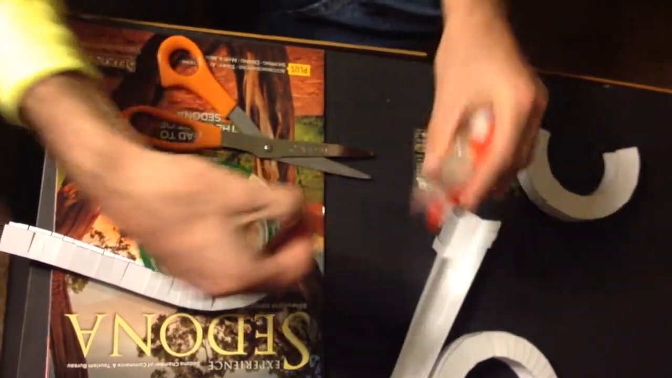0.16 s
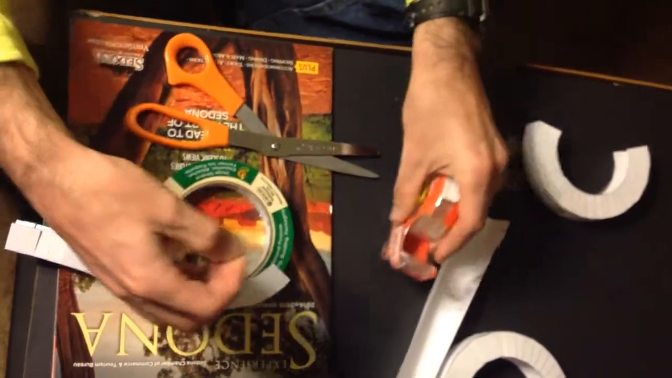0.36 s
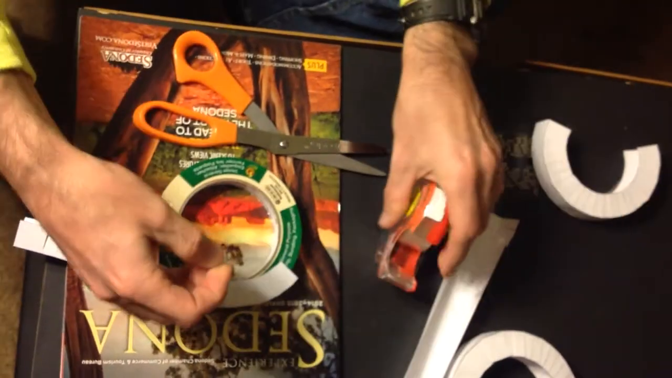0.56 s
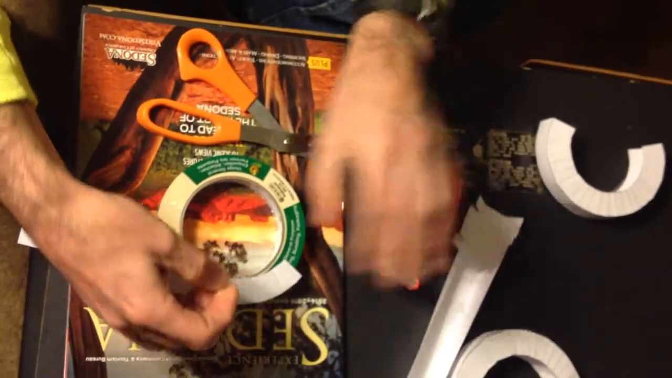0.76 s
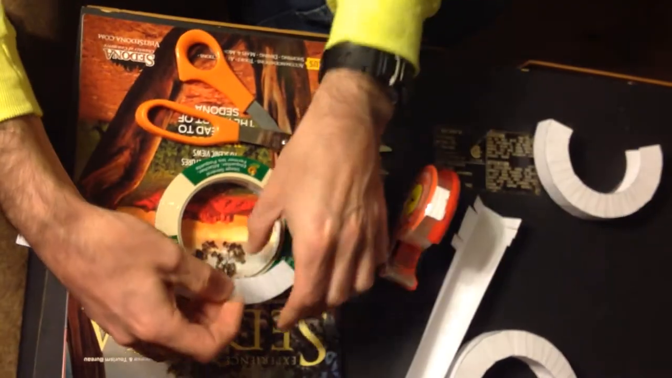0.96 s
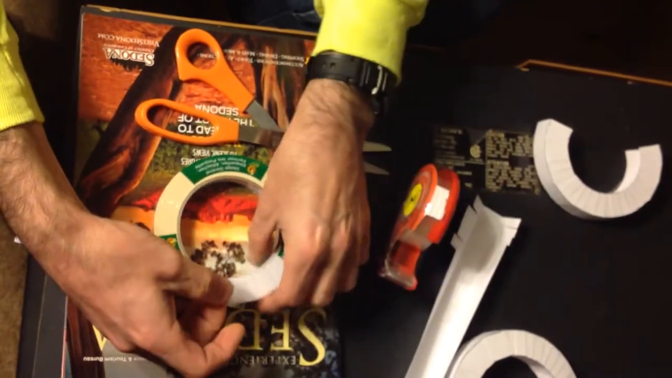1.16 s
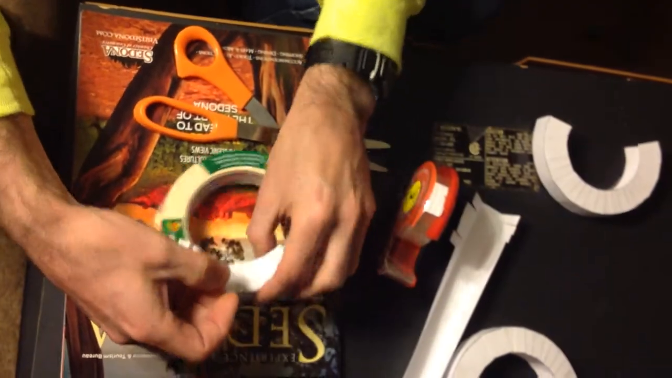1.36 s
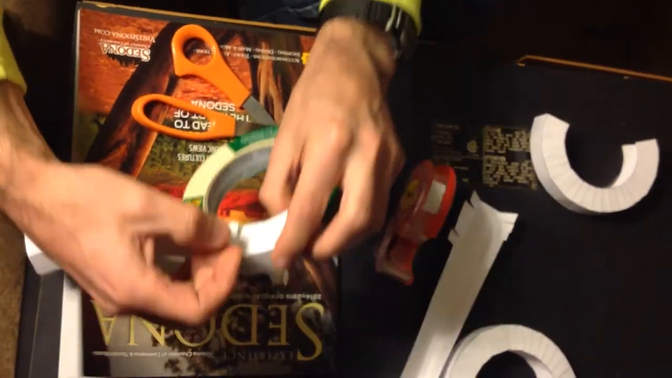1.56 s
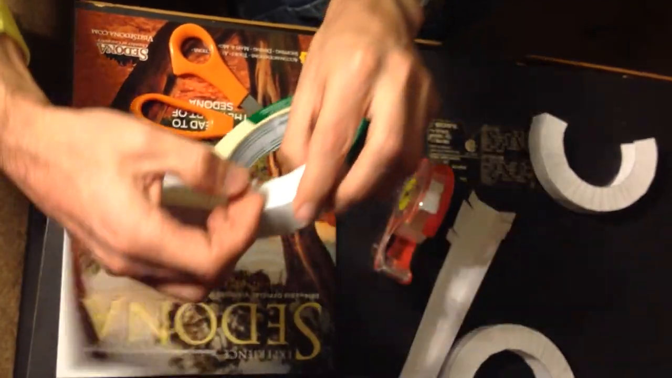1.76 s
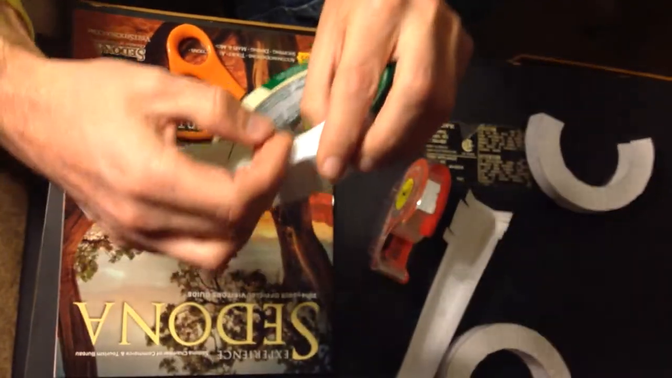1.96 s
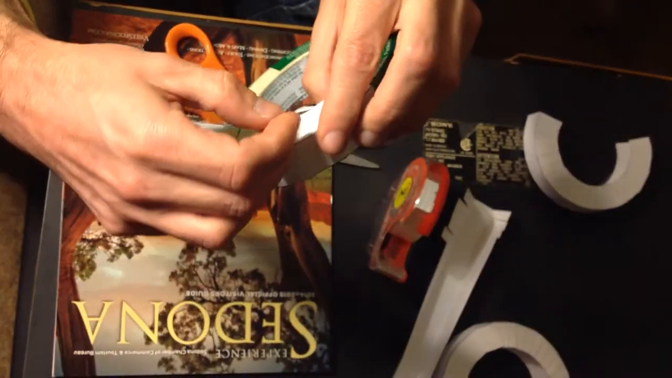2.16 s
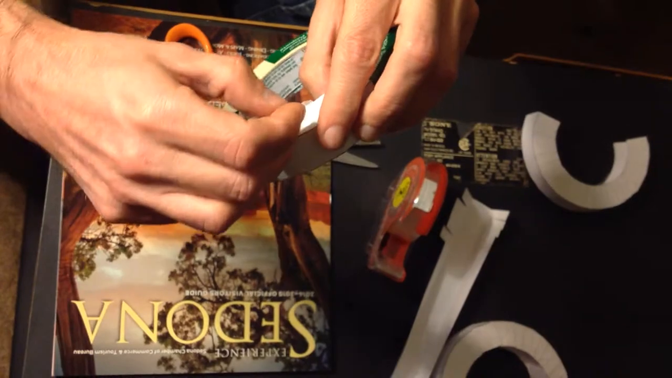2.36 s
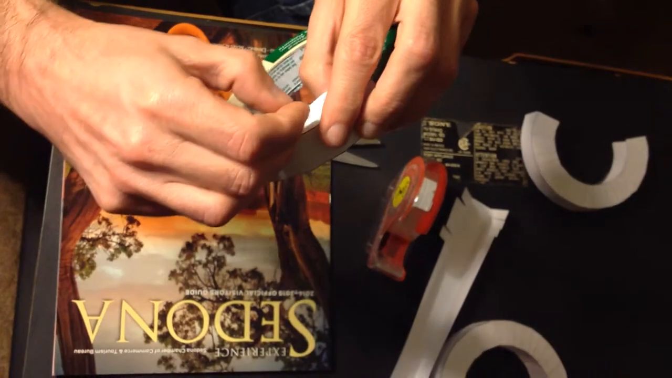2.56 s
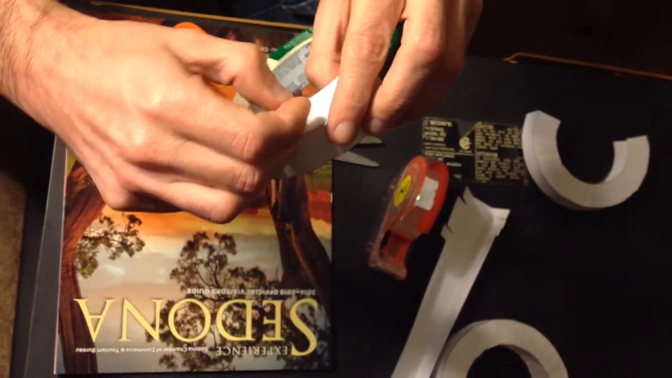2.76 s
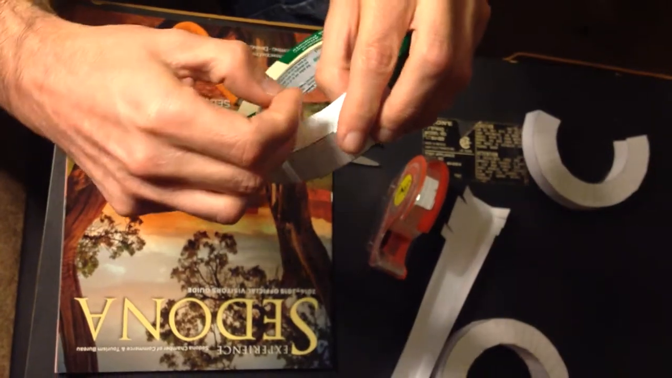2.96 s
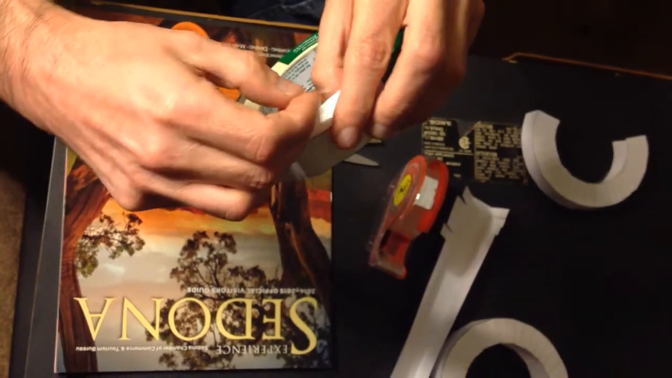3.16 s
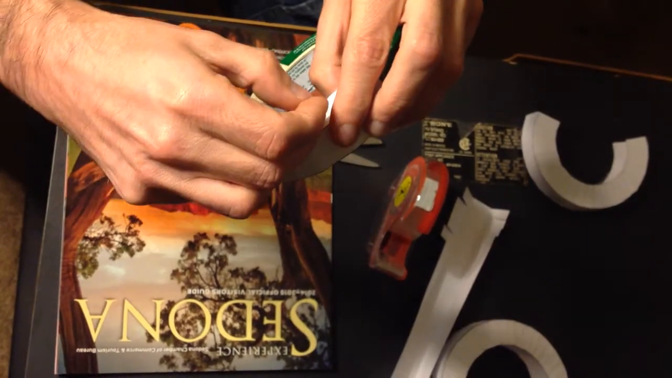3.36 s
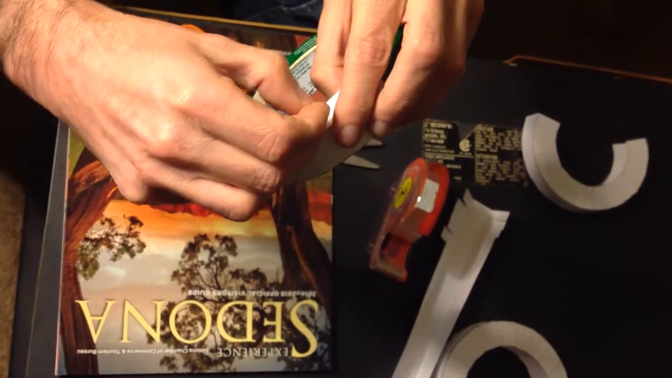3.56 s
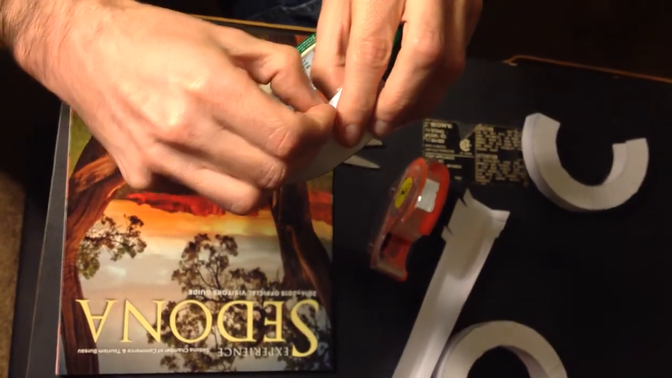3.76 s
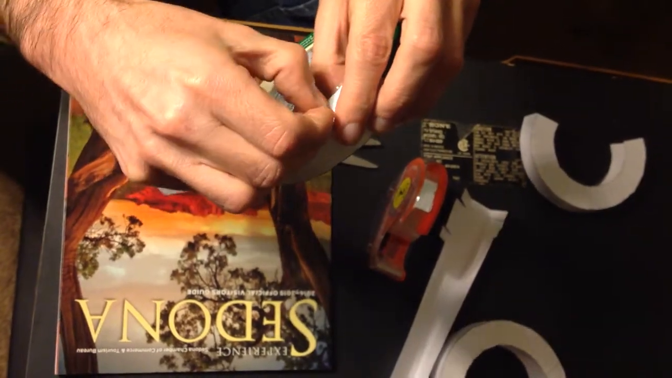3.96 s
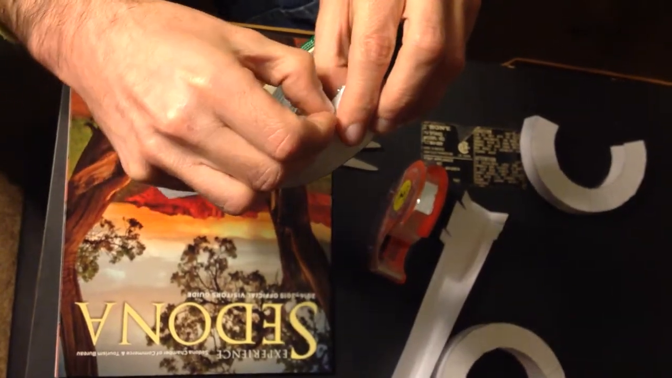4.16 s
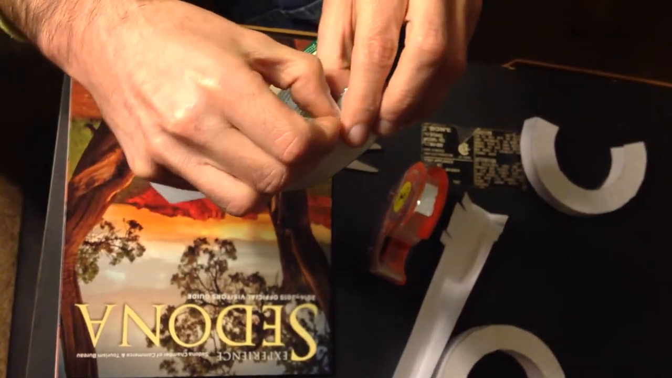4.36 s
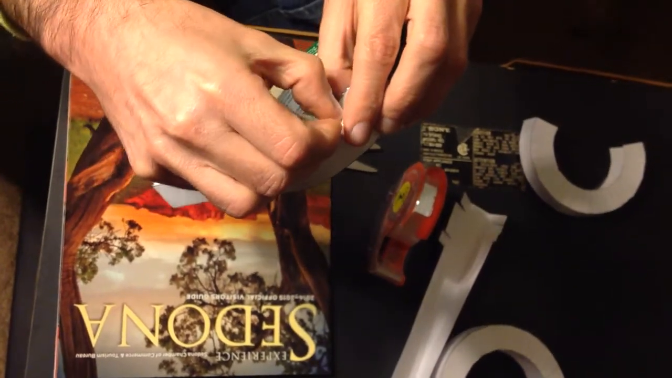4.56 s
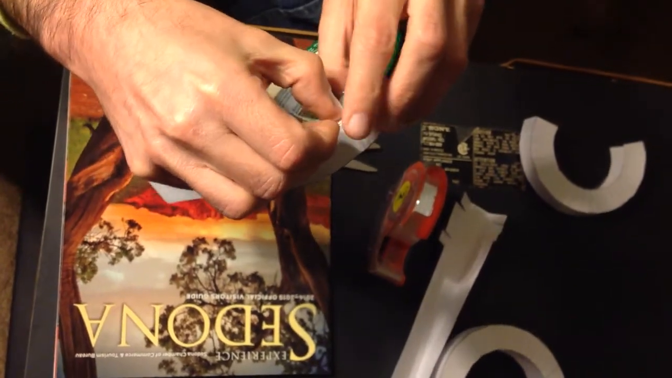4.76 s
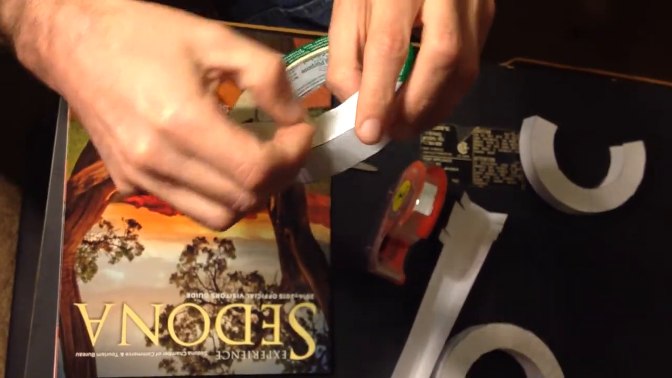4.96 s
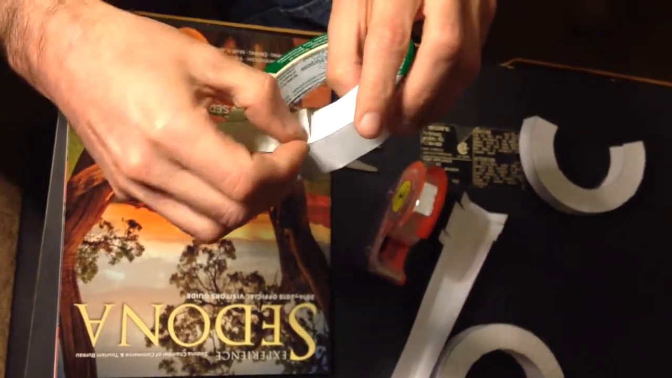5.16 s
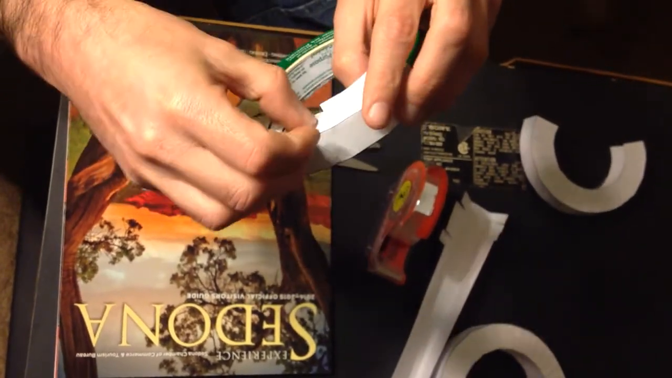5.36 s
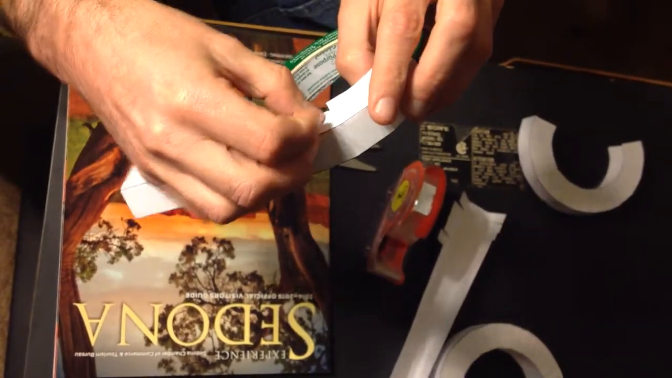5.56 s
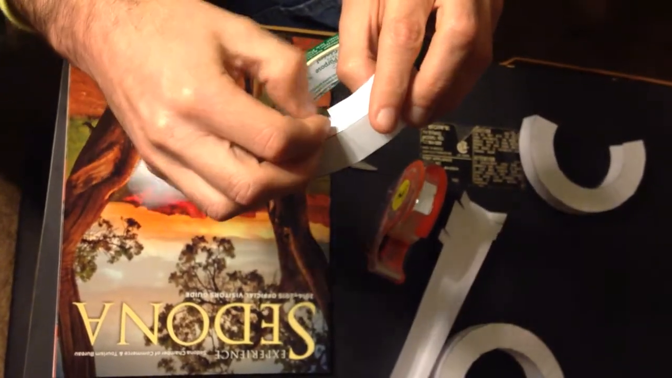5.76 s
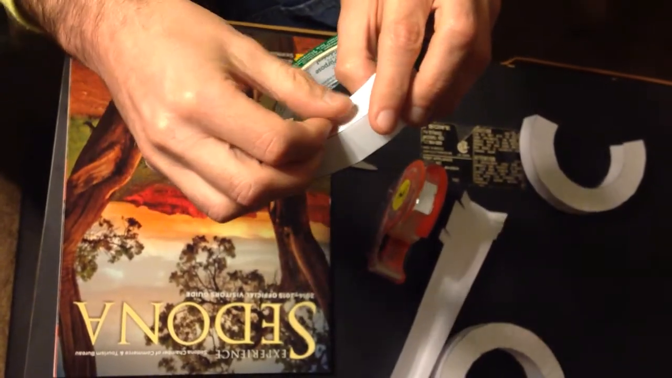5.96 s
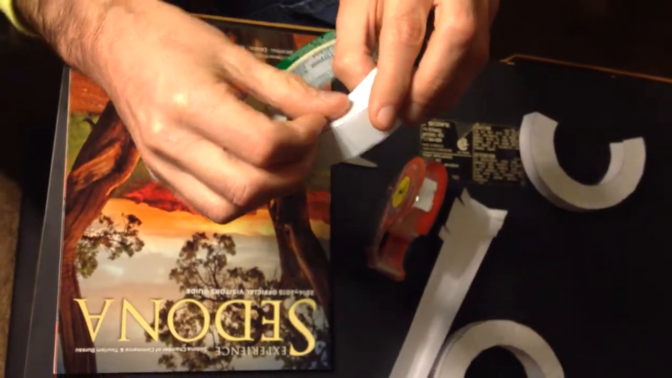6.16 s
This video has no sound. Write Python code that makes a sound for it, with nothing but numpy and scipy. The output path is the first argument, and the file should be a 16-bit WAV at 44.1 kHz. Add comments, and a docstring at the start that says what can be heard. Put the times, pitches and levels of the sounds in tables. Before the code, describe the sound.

Close above a desk indoors: a bright, abrupt tape rip opens, followed by light hollow taps and papery rubbing. A small dispenser is set down in two knocks, the second louder and harder. Fingers slide over paper while a thin hum briefly swells and fades. After a lull, a stiff strip snaps loudly, then only small dry clicks and delicate crinkling remain over faint hiss.

```python
"""Over faint hiss and a hum that swells then fades, sticky tape tears tooth by tooth on a small dispenser's cutter.
Fingers then slide on paper (stick-slip clicks), creases buckle, and the cardboard roll is bumped.
The dispenser is set down on a desk in two knocks (contact bursts exciting resonances); sliding and crackling go on.
Later the paper strip snaps sharply and, as a thumb presses the tape down, it crinkles in tiny buckling clicks.
A small room answers all but the hiss and hum with one near-wall echo and a frequency-dependent decay."""
import sys
import numpy as np
from scipy import signal
from scipy.fft import rfft, irfft
from scipy.io import wavfile
from scipy.ndimage import uniform_filter1d

SR = 44100
rng = np.random.default_rng(int(sys.argv[2]) if len(sys.argv) > 2 else 0)


def output_pcm(signal):
    """Save a mono or channel-first signal as 16-bit PCM at the path in sys.argv[1].

    Samples are clipped to [-1, 1] before scaling.
    """
    pcm = np.clip(np.atleast_2d(signal).T, -1, 1) * 32767
    wavfile.write(sys.argv[1], SR, np.round(pcm).astype(np.int16))


N = 274547
TIME = np.arange(N) / SR
BLOCK = 4096  # samples in an impulse response
FREQ = np.maximum(np.arange(BLOCK // 2 + 1) * SR / BLOCK, 1)  # bin frequencies [Hz]


def undb(db):
    """Decibel definition: level to amplitude ratio."""
    return 10 ** (np.asarray(db) / 20)


def unit(x):
    """Energy normalization: the squares sum to one."""
    return x / np.sqrt(np.sum(x ** 2))


def curve(points, hz=FREQ):
    """Spectral envelope: (frequency [Hz], value) points joined linearly on a log-frequency axis."""
    at, value = np.transpose(points)
    return np.interp(np.log(hz), np.log(at), value)


def hump(hz, height_db, octaves):
    """Broad formant: a Gaussian rise in level on a log-frequency axis."""
    distance = np.log2(FREQ / hz) / octaves
    return height_db * np.exp(-.5 * distance ** 2)


def resonances(modes):
    """Modal superposition: Lorentzian peaks in dB from (frequency [Hz], width [Hz], height [dB])."""
    return sum(db / (1 + (2 * (FREQ - hz) / width) ** 2) for hz, width, db in modes)


def flutter(length, rate):
    """Slow random modulation: normal values, about rate a second, joined by straight lines."""
    steps = np.arange(length) * rate / SR
    return np.interp(steps, np.arange(length), rng.standard_normal(length))


def response(db):
    """Minimum phase: folding the cepstrum gives the causal impulse response of a spectrum in dB."""
    cepstrum = irfft(np.log(undb(db)))
    cepstrum[1:BLOCK // 2] *= 2
    cepstrum[BLOCK // 2 + 1:] = 0
    return unit(irfft(np.exp(rfft(cepstrum))))


def add(track, s, sound):
    """Linear superposition: mix a sound into the track at time s."""
    start = max(int(s * SR), 0)
    part = sound[:max(len(track) - start, 0)]
    track[start:start + len(part)] += part


def contact(ms, chatter_db, grip=0.42):
    """Impulsive contact: a first touch, then chatter that builds and decays, whitened to a near-flat spectrum."""
    age = 1000 * TIME[:BLOCK // 2] / ms  # in decay times
    envelope = np.exp(-age) * (1 - np.exp(-age / grip))
    force = undb(chatter_db) * unit(rng.standard_normal(len(age)) * envelope)
    force[0] += 1
    power = uniform_filter1d(np.abs(rfft(force, BLOCK)) ** 2, size=41)
    whitener = response(-10 * np.log10(power + 1e-3))
    return signal.fftconvolve(force, whitener)[:BLOCK]


def strike(force, answer, db):
    """Source-filter principle: a force convolved with an object's response, at a set energy."""
    return undb(db) * unit(signal.fftconvolve(force, answer))


# reverberation time of the room: (frequency [Hz], T60 [s])
REVERBERATION = [(70, 0.24), (180, 0.62), (600, 0.45), (2000, 0.4), (6000, 0.38), (10000, 0.29),
                 (15000, 0.18)]


def room(x, wet_db, echo_s=.0122, echo_db=-12, echo_ms=1.9, build_s=0.0043, patchy_db=0.5):
    """Room reverberation: one near-wall echo and clustered reflections with a decay time for each band."""
    t = TIME[:SR // 2]
    noise = rfft(rng.standard_normal(len(t)) * undb(patchy_db * flutter(len(t), rate=340)))
    hz = np.maximum(np.arange(len(noise)) * SR / len(t), 1)
    centres = np.array(REVERBERATION)[:, 0]
    tail = 0
    # each row of the identity picks one band, which crossfades into its neighbours
    for own, (_, t60) in zip(np.eye(len(centres)), REVERBERATION):
        band = curve(np.c_[centres, own], hz)
        tail = tail + irfft(noise * band, len(t)) * undb(-60 * t / t60)
    tail = unit(tail * (1 - np.exp(-(t / build_s) ** 2)))
    add(tail, echo_s, undb(echo_db) * unit(contact(echo_ms, chatter_db=9)))
    return x + undb(wet_db) * signal.fftconvolve(x, tail)[:len(x)]


# spectral shape of the room's steady air: (frequency [Hz], relative spectral density [dB])
AIR_SPECTRUM = [(15, -65.5), (25, -37.5), (90, -23), (103, -13.5), (128, -6), (213, -1.5), (326, -5),
                (475, -6.5), (673, -9.5), (978, -8), (1090, -11.5), (1210, -11.5), (1860, -12.5),
                (2020, -13.5), (15000, -16)]
AIR_DB = -65.5
HUM_HZ, HUM_PEAK_S, HUM_DB, HUM_FAINT_DB = 334, 1.34, -76.5, -98
HUM_HOLD_S, HUM_RISE_DB_PER_S, HUM_FALL_DB_PER_S = 0.73, 35, 9


def air(waver_db=8.0):
    """Stationary noise and a modulated tone: steady hiss with a low murmur, and a thin wavering hum."""
    noise = rng.standard_normal(N + BLOCK)
    hiss = signal.fftconvolve(noise, response(curve(AIR_SPECTRUM)))[BLOCK:BLOCK + N]
    pitch = HUM_HZ + 0.63 * flutter(N, rate=7.0)
    hum = np.sqrt(2) * np.sin(2 * np.pi * np.cumsum(pitch) / SR)  # RMS of one
    age = TIME - HUM_PEAK_S
    rise = HUM_RISE_DB_PER_S * np.minimum(age, 0)
    fall = HUM_FALL_DB_PER_S * np.maximum(age - HUM_HOLD_S, 0)
    swell = np.maximum(HUM_DB + rise - fall, HUM_FAINT_DB)
    return undb(AIR_DB) * hiss + hum * undb(swell + waver_db * flutter(N, rate=5.82))


# spectral envelope of the taut film: (frequency [Hz], relative level [dB])
FILM_SPECTRUM = [(60, -26), (200, -21), (400, -18.5), (700, -9.5), (1100, -7), (2400, -0.5), (3800, -4.5),
                 (5800, -4), (8000, -1.5), (12000, 2.5), (15500, -1.5)]
# resonances of cutter and shell held in the air: (frequency [Hz], width [Hz], height [dB])
CUTTER_MODES = [(672, 200, 3.5), (1315, 70, 9), (1840, 34, 8), (2490, 200, 6.5), (3610, 140, 7.5),
                (4710, 79, 6), (5600, 310, 11), (6160, 250, 8.5), (10840, 330, 2), (12400, 1200, 4.5)]
# the tear grows to its hardest bite, eases, and the last edge pops free
TEAR_S, BITE_S, FREE_S = .004, 0.0068, 0.017
TEETH_PER_S, TOOTH_JITTER_S, TOOTH_SPREAD_DB = 585, .0001, 1
BITE_DB, FREE_DB = 1.5, -1
GROW_DB_PER_S, EASE_DB_PER_S = 2897, 900


def tear(count=7):
    """Successive fracture: each tooth's puncture cracks the film and rings the cutter."""
    out = np.zeros(N)
    cutter = response(curve(FILM_SPECTRUM) + resonances(CUTTER_MODES))
    at = TEAR_S + np.arange(count) / TEETH_PER_S
    jitter, spread = rng.standard_normal((count, 2)).T
    drop = np.maximum(GROW_DB_PER_S * (BITE_S - at), EASE_DB_PER_S * (at - BITE_S))
    level = BITE_DB - drop + TOOTH_SPREAD_DB * spread
    teeth = zip(at + TOOTH_JITTER_S * jitter, level)
    for s, db in [*teeth, (FREE_S, FREE_DB)]:
        crack = strike(contact(ms=0.41, chatter_db=6.5), cutter, db)
        crack = np.pad(crack, (0, SR // 2))  # space for the reverberation
        # the film swings as it parts, so each crack reaches the walls by other paths
        add(out, s, room(crack, wet_db=-8.5, echo_db=0.0, echo_ms=7.4))
    return out


# fingers slide on paper and plastic:
# (time of the peak [s], Gaussian half-width [s], peak level [dB], hump centre [Hz])
FINGER_STROKES = [(.155, 0.036, -58, 5240), (0.546, 0.0071, -64, 5000), (0.939, 0.039, -67.5, 7900),
                  (1.087, 0.023, -62, 10200), (1.229, 0.024, -61.5, 4500), (1.396, 0.015, -61.5, 5000),
                  (1.487, 0.033, -55, 5540), (1.753, .022, -61, 2400), (2.032, 0.18, -74, 3050),
                  (5.349, 0.043, -67.5, 9000), (5.53, .012, -59.5, 6030)]


def strokes(slips_per_s=4500, spread_db=4.0, jerk_db=2):
    """Stick-slip friction: skin catches and slips on fibres in dense tiny clicks that swell and fade unevenly."""
    out = np.zeros(N)
    surface = curve([(100, -6), (500, 3), (1800, 3), (3600, 0.0), (6000, -3.5), (9000, 1.0), (15000, -3.0)])
    for s, half, db, hz in FINGER_STROKES:
        t = TIME[np.abs(TIME - s) < 3 * half] - s
        count = 2 * SR  # long enough for a stable standard deviation
        slips = (rng.random(count) < slips_per_s / SR) * rng.standard_normal(count)
        slips *= undb(spread_db * rng.standard_normal(count) + jerk_db * flutter(count, rate=160))
        speed = np.exp(-.5 * (t / half) ** 2)[:count]
        friction = slips[:len(speed)] / slips.std() * speed
        colour = response(surface + hump(hz, height_db=8.0, octaves=1.0))
        add(out, s + t[0], undb(db) * signal.fftconvolve(friction, colour))
    return room(out, wet_db=-4)


# spectral envelope of the paper strip: (frequency [Hz], relative level [dB])
PAPER_SPECTRUM = [(60, -36), (200, -15), (430, -6), (750, -7.5), (1200, -6), (2500, -3.5), (3100, -4.5),
                  (3900, -1.5), (7000, 1), (12000, 0.5), (15500, -3)]
# resonances of the strip: (frequency [Hz], width [Hz], height before any ring factor [dB])
STRIP_MODES = [(970, 110, 6.2), (1113, 140, 9.4), (1560, 180, 5.3), (3550, 180, 11.3), (4970, 170, 1.7)]
# creases in tape and paper flick over:
# (time [s], energy level [dB], bright hump centre [Hz], body hump height [dB], chatter decay [ms])
CREASE_EVENTS = [(.192, -28, 10900, 4, 1.1), (.399, -32.5, 6070, 4, 0.49), (.9795, -35.5, 8400, 1, 0.62),
                 (1.1069, -23.5, 7640, 0.5, 1.1), (1.23, -32, 5860, 13, 1.6),
                 (2.3828, -33.5, 13000, 12, .9), (2.8322, -18.5, 12500, 0, .9), (2.8797, -24, 11000, 3, .8),
                 (2.8916, -24.5, 9000, 7, 1.4), (4.033, -35, 5700, 7, 1.1),
                 (4.0388, -21.5, 11500, -4, 0.82), (4.2215, -27.5, 5400, -3, .8),
                 (4.637, -33, 9050, -14, 1.1), (4.6532, -22.5, 12900, -2.5, 1.7),
                 (4.9215, -33.5, 12700, -14, 1), (5.2824, -20.5, 8300, 0, 2.4),
                 (5.5168, -26.5, 8350, 8.5, 1.9), (5.5939, -33.5, 7100, 1, 2.7),
                 (5.8101, -34, 12000, 6, 1.5), (6.0667, -35, 9200, -9, 1.4)]


def creases(creak_s=0.01, creak_db=-13, ring=.9):
    """Buckling instability: fibres creak, then the crease cracks; the more paper it moves, the fuller its body."""
    out = np.zeros(N)
    paper = curve(PAPER_SPECTRUM) + ring * resonances(STRIP_MODES)
    lead = TIME[:BLOCK // 4]
    for s, db, hz, body_db, ms in CREASE_EVENTS:
        brightness = hump(hz, height_db=7.5, octaves=0.14)
        body = hump(940, body_db, octaves=0.49)
        strip = response(paper + brightness + body)
        creak = rng.standard_normal(len(lead)) * np.exp((lead - lead[-1]) / creak_s)
        add(out, s - lead[-1], strike(creak, strip, db + creak_db))
        add(out, s, strike(contact(ms, chatter_db=5), strip, db))
    return room(out, wet_db=-10.5)


# fingers bump the cardboard roll: (time [s], energy level [dB], hump centre [Hz])
ROLL_TAPS = [(0.1921, -20.5, 1230), (0.2288, -27, 2320), (0.417, -34.5, 3300), (1.7679, -23, 1810),
             (6.217, -30, 220)]


def taps():
    """Impact excitation: hollow bumps of the roll, each with one broad resonance."""
    out = np.zeros(N)
    roll = curve([(50, -30), (200, 0), (600, 8), (2500, 0.0), (4500, -2), (7000, -10), (15000, -13)])
    for s, db, hz in ROLL_TAPS:
        answer = response(roll + hump(hz, height_db=17, octaves=0.25))
        add(out, s, strike(contact(ms=1.18, chatter_db=-3.5), answer, db))
    return room(out, wet_db=-7)


# the dispenser meets the desk, heel first:
# (time [s], energy level [dB], chatter decay [ms], room level [dB])
DESK_KNOCKS = [(0.4348, -4.5, 1.67, -5), (.6040, 2.5, 1.11, -6)]
# resonances of dispenser on desk: (frequency [Hz], width [Hz], height [dB])
DISPENSER_MODES = [(183, 42, 7), (429, 9.7, 9), (613, 45, 4.5), (820, 10, 12), (947, 25, 8),
                   (1070, 110, 4.5), (1170, 16, 6.5), (1312, 37, 4.5), (1490, 79, 2.5), (1630, 68, 6.5),
                   (1914, 36, 5.5), (2113, 45, 6), (2200, 44, 3.5), (2624, 180, 7), (4270, 290, 5),
                   (5410, 200, 6), (6300, 170, 5)]
# envelope of the first knock, the heel alone: (frequency [Hz], relative level [dB])
HEEL_SPECTRUM = [(30, -17), (90, -7), (190, -0.5), (290, 2.5), (430, -4), (620, 1.5), (850, -1), (1450, 8),
                 (2000, -2), (3000, -7), (4500, -12), (6300, -14.5), (9000, -22), (15500, -27)]
# envelope of the second knock, the whole shell: (frequency [Hz], relative level [dB])
SHELL_SPECTRUM = [(30, -46), (110, -24), (200, -6.5), (290, -4), (400, -4.5), (580, 3.5), (740, -8.5),
                  (1000, -1), (1600, -0.5), (2700, -3), (3200, -10), (5800, -9.5), (10500, -12.5),
                  (15500, -18)]


def knocks():
    """Modal excitation by impact: the dispenser lands with a dull thud, then tips flat with a brighter clack."""
    out = np.zeros(N)
    for (s, db, ms, room_db), shape in zip(DESK_KNOCKS, (HEEL_SPECTRUM, SHELL_SPECTRUM)):
        blow = np.zeros(N)
        answer = response(curve(shape) + resonances(DISPENSER_MODES))
        add(blow, s, strike(contact(ms, chatter_db=10.0), answer, db))
        out += room(blow, room_db)
    return out


# the bent strip springs through, then its edge slaps back:
# (time [s], energy level [dB], chatter decay [ms])
SNAP_EVENTS = [(2.9037, -4.5, 1.66), (2.9072, -16.5, 1.6), (2.9155, -18, 2.4)]
# spectral envelope of the strip under tension: (frequency [Hz], relative level [dB])
TAUT_SPECTRUM = [(60, -33), (200, -11), (430, 1), (720, -1), (880, -1), (1600, 0), (2300, -5), (3050, -12),
                 (3700, -1.5), (6000, 0), (8200, 1.5), (12000, -1), (15500, -5.5)]


def snap():
    """Snap-through buckling: the bent strip gives way all at once under the thumb."""
    out = np.zeros(N)
    strip = response(curve(TAUT_SPECTRUM) + 0.44 * resonances(STRIP_MODES))
    for s, db, ms in SNAP_EVENTS:
        add(out, s, strike(contact(ms, chatter_db=6.5), strip, db))
    return room(out, wet_db=-11.0)


# the thumb presses the tape down: (start [s], length [s], mean energy level of a crinkle [dB])
THUMB_PRESSES = [(4.602, .045, -40), (4.776, .035, -37), (4.859, 0.12, -42), (6.083, .025, -40.5)]
CRINKLES_PER_S, CRINKLE_SPREAD_DB, CRINKLE_HZ, CRINKLE_MS = 100, 3, 9500, 2.6


def crinkles():
    """Crackling noise: tiny bright creases give way at uneven moments and with uneven strength."""
    out = np.zeros(N)
    brightness = hump(CRINKLE_HZ, height_db=7.5, octaves=.8)
    strip = response(curve(PAPER_SPECTRUM) + resonances(STRIP_MODES) + brightness)
    for start, length, db in THUMB_PRESSES:
        for slot in np.arange(0, length, 1 / CRINKLES_PER_S):
            s = start + slot + rng.random() / CRINKLES_PER_S
            level = db + CRINKLE_SPREAD_DB * rng.standard_normal()
            add(out, s, strike(contact(CRINKLE_MS, chatter_db=8), strip, level))
    return room(out, wet_db=-7.5)


def scene():
    """Superposition: the pressures of all sources add at one microphone above the desk."""
    handling = strokes() + creases() + taps()
    return (air() + tear() + handling + knocks() + snap() + crinkles())[None]


def record(dry):
    """Band limitation: a steep elliptic low-pass cuts the top."""
    top_hz = 15450
    lowpass = signal.ellip(10, .2, 70, top_hz, fs=SR, output="sos")
    return signal.sosfilt(lowpass, dry)


dry = scene()
out = record(dry)
output_pcm(out)
```